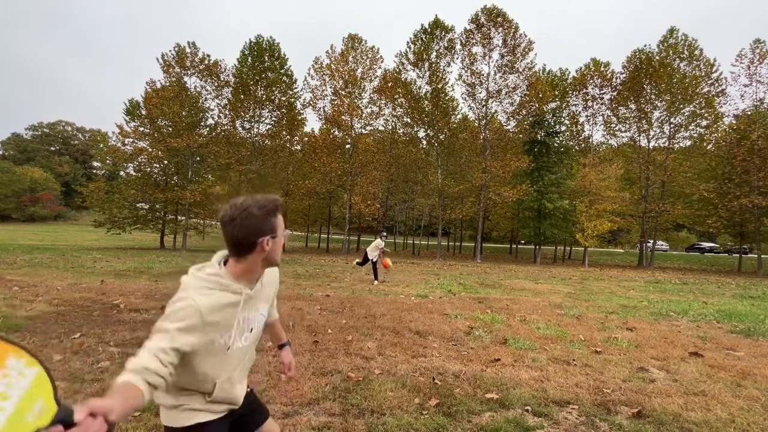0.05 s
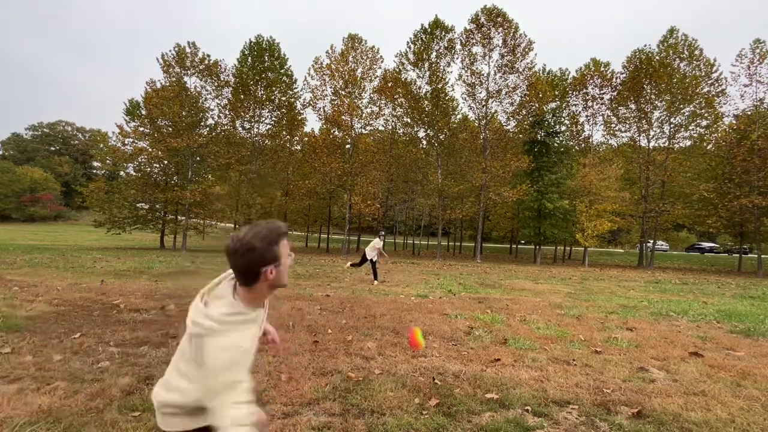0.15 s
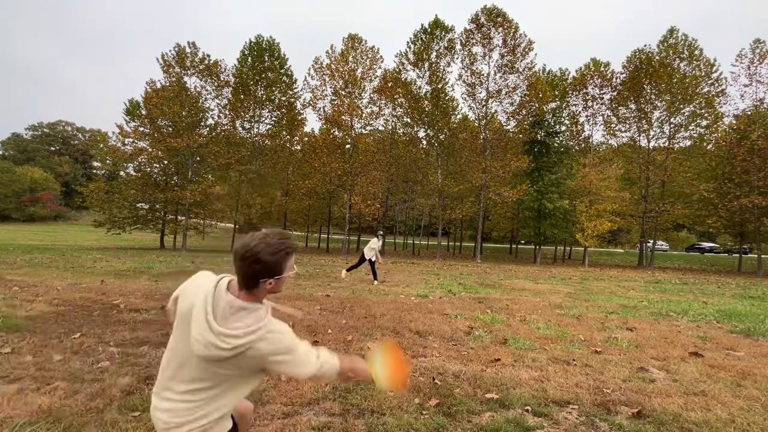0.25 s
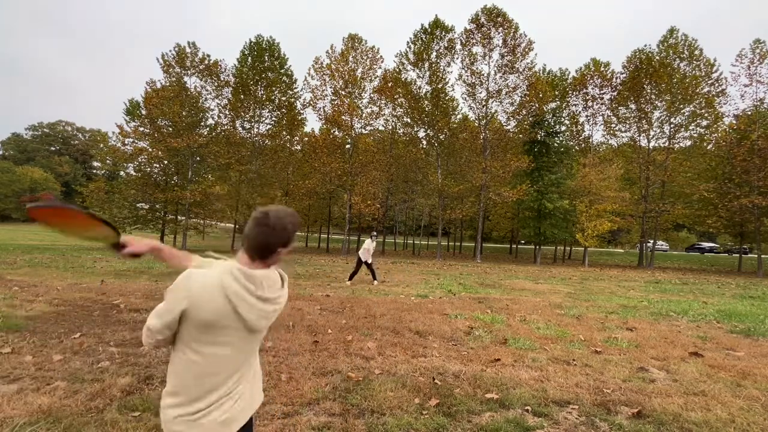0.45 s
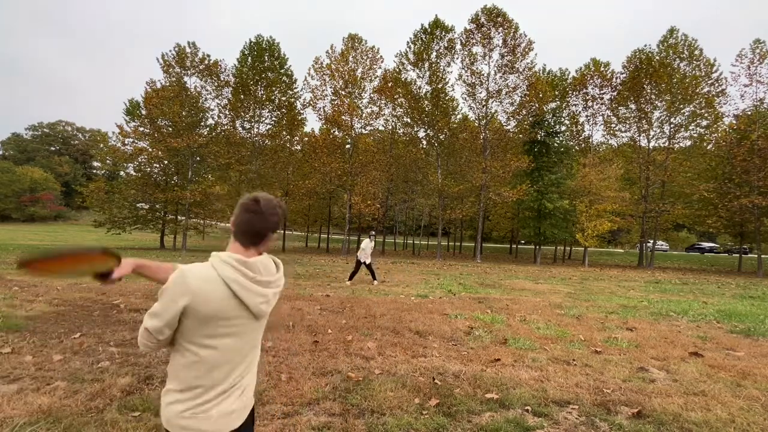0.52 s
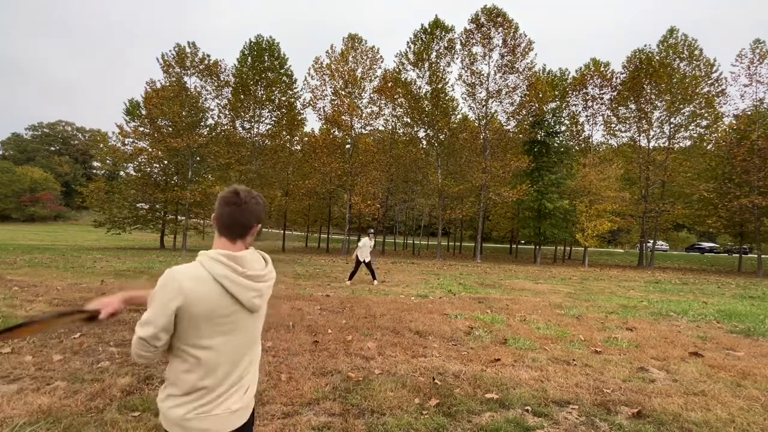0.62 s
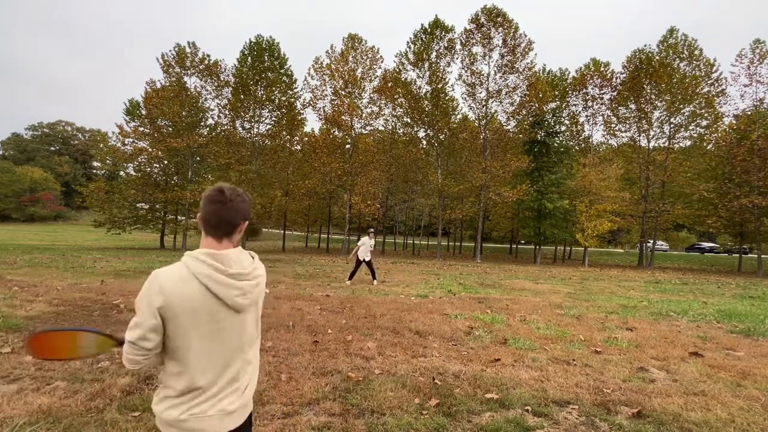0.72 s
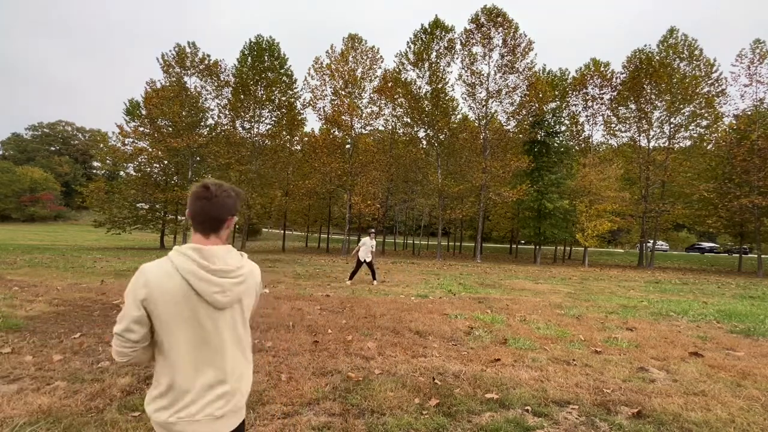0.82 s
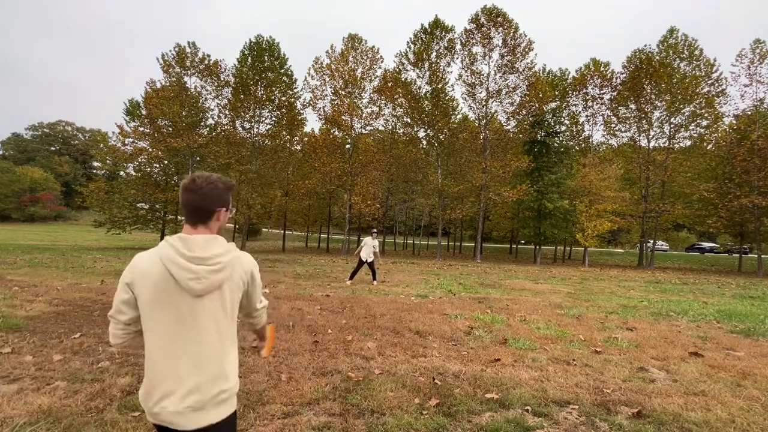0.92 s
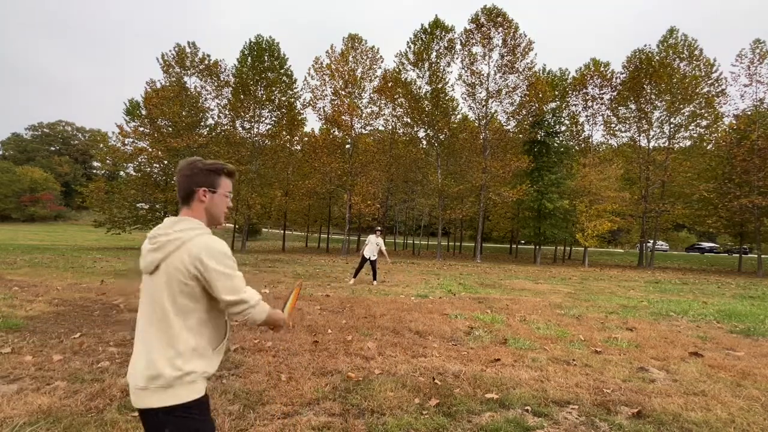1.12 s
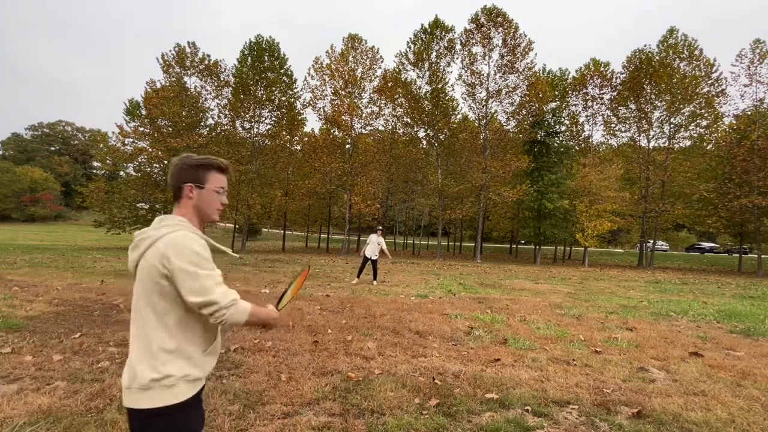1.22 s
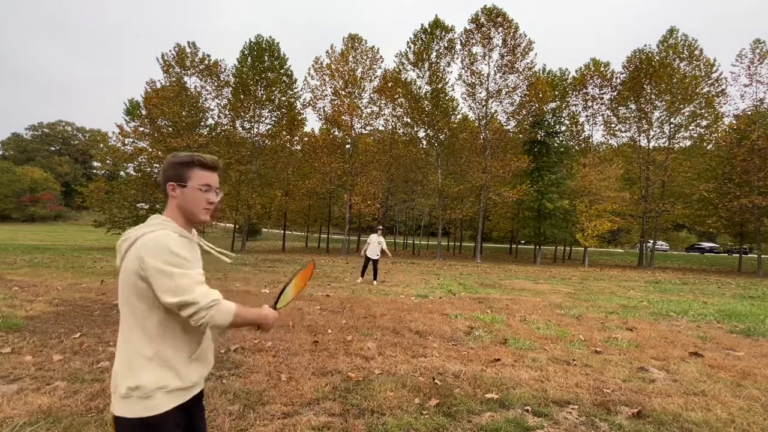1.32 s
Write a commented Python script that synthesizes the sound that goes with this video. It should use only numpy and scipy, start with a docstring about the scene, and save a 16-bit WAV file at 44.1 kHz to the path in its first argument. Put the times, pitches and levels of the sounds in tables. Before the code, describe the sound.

A paddle strikes a plastic ball with one sharp, hollow crack close to the microphone, after a brief swish. The ball whistles faintly away, then clothes rustle and feet scuff softly through dry grass in a quiet open field.

```python
"""A brief rush of air ends in a sharp, hollow crack: a paddle hits a plastic ball in an open field.
The impact excites damped modes of ball and paddle, and the blade bends with a low pock.
Air flowing over the ball's holes whistles as it flies away, and it lands with a faint knock.
The player's clothes rub and feet scuff through dry grass, as friction and impact noise,
over a low outdoor rumble and a thin hiss of insects."""
import sys
import numpy as np
from scipy import signal
from scipy.fft import rfft, irfft
from scipy.io import wavfile
from scipy.ndimage import uniform_filter1d

SR = 44100
rng = np.random.default_rng(int(sys.argv[2]) if len(sys.argv) > 2 else 0)


def waveform_to_disk(signal):
    """Save audio, clipped to [-1, 1], as 16-bit WAV at the path in sys.argv[1]."""
    frames = np.transpose(np.atleast_2d(signal))
    scaled = np.clip(frames, -1, 1) * 32767
    samples = np.round(scaled).astype(np.int16)
    wavfile.write(sys.argv[1], SR, samples)


N = 59535
T = np.arange(N) / SR
HIT_S = .2128


def amp(db):
    """Amplitude ratio of a level in decibels."""
    return 10 ** (np.asarray(db) / 20)


def unit_rms(x):
    """Normalisation to unit mean power."""
    return x / np.sqrt(np.mean(x ** 2) + 1e-20)


def curve_at(points, hz):
    """Interpolation along a logarithmic frequency axis."""
    freq_hz, value = np.transpose(points)
    return np.interp(np.log(hz + 1), np.log(freq_hz + 1), value)


def sides(pan_db):
    """Level-difference panning: two gains, the left pan_db above the right."""
    return amp(np.array([[.5], [-.5]]) * pan_db)


def noise(spectrum, pan, coherence, grain_db=0):
    """Spectrally shaped stereo noise of unit rms; grain, a random gain per sample, makes it crackle."""
    hz = np.fft.rfftfreq(N, 1 / SR)
    white = rng.standard_normal((2, N))
    grain = amp(grain_db * np.minimum(rng.exponential(1, N), 5))
    left, independent = rfft(white * grain)
    shared = np.clip(curve_at(coherence, hz) if np.ndim(coherence) else coherence, -1, 1)
    right = shared * left + np.sqrt(1 - shared ** 2) * independent
    gain = amp(curve_at(spectrum, hz)) * sides(curve_at(pan, hz) if np.ndim(pan) else pan)
    return unit_rms(irfft(np.array([left, right]) * gain, N))


def tick(start_s, spectrum, pan):
    """Minimum-phase impulse: a sharp causal pulse of unit energy with the given spectrum."""
    hz = abs(np.fft.fftfreq(2048, 1 / SR))
    log_gain = np.log(amp(curve_at(spectrum, hz)) * sides(curve_at(pan, hz)))
    pulse = np.fft.ifft(np.exp(np.conj(signal.hilbert(log_gain)))).real
    out = np.zeros((2, N))
    at = int(round(start_s * SR))
    out[:, at:at + pulse.shape[1]] = pulse
    return out / np.sqrt(np.sum(out ** 2) / 2)


def decay(start_s, attack_s, hold_s, t60_s):
    """Damped envelope: a linear rise, a hold, then a fall of 60 dB every t60_s."""
    age = T - start_s
    return np.clip(age / attack_s, 0, 1) * amp(-60 * np.maximum(age - attack_s - hold_s, 0) / t60_s)


def swell(peak_s, rise_s, fall_s):
    """Exponential growth to a peak, then exponential decay."""
    return np.exp(-np.maximum((peak_s - T) / rise_s, (T - peak_s) / fall_s))


def tone(start_s, hz):
    """A sine whose phase is the integral of its frequency from start_s on."""
    return np.sin(2 * np.pi * np.cumsum(hz * (T >= start_s)) / SR)


def wander(samples):
    """Low-pass noise: slow random motion of unit rms."""
    return unit_rms(uniform_filter1d(uniform_filter1d(rng.standard_normal(N), samples), samples))


# First instant of contact, then the rough burst: freq_hz, density_db (relative level per hertz)
SNAP_SPECTRUM = [(300, -22), (900, -7.5), (1500, -10), (2300, -8.5), (3100, 7.5), (3800, 0.5), (4600, 2.5),
                 (5600, -9.5), (6800, -17.5), (8200, -11.5), (9400, -8.5), (12500, -7), (14500, -16),
                 (16000, -36.5)]
CRACK_SPECTRUM = [(300, -11.5), (800, 6), (1100, 3), (1400, 7), (2000, 5.5), (2500, -3.5), (3050, 3.5),
                  (3800, -7), (4700, -6), (6500, -21.5), (9500, -15.5), (12500, -20), (15000, -27),
                  (16500, -35.5)]
# Stereo balance of both: freq_hz, pan_db
CRACK_BALANCE = [(700, -13.5), (1500, 7.5), (3100, 2.5), (4700, 20), (7000, 13), (8200, -6), (9400, -18),
                 (11000, 8), (15000, -6)]
# Modes of the ball and the paddle face: pitch_hz, level_db (relative), t60_s, pan_db
IMPACT_MODES = [(748, -29, 0.08, -7), (1373, -31.5, 0.036, 11), (1434, -29.5, 0.072, -3),
                (1760, -26, 0.058, 3.5), (2006, -26, 0.055, 10.5), (2293, -31, 0.05, -8),
                (2694, -36, .06, 3.5), (2944, -25, 0.052, 8), (3394, -29, 0.044, -3.5),
                (3763, -32.5, .055, -1.5), (4310, -34, .04, 9), (4740, -32, .04, 11.5)]


def crack():
    """Impact excitation: a snap and a noise burst set damped modes ringing; the ground scatters a tail."""
    snap_s, rebound_s, echo_s, right_lag_s = .21305, .0008, .0033, .00006
    snap = -amp(-.5) * tick(snap_s, SNAP_SPECTRUM, CRACK_BALANCE)
    rebound = amp(-3.5) * tick(snap_s + rebound_s, SNAP_SPECTRUM, CRACK_BALANCE)
    body_echo = -amp(-5.5) * tick(snap_s + echo_s, SNAP_SPECTRUM, CRACK_BALANCE)  # off the player
    burst = amp(-20) * noise(CRACK_SPECTRUM, CRACK_BALANCE, .6) * decay(HIT_S, .00032, .0034, .041)
    ring = np.zeros((2, N))
    for hz, db, t60_s, pan_db in IMPACT_MODES:
        mode = np.array([tone(HIT_S, hz), tone(HIT_S + right_lag_s, hz)])
        ring += amp(db) * sides(pan_db) * mode * decay(HIT_S, .0005, 0, t60_s)
    scatter = amp(-38.5) * noise(CRACK_SPECTRUM, CRACK_BALANCE, .34) * decay(HIT_S, .005, .006, .13)
    return snap + rebound + body_echo + burst + ring + scatter


def paddle():
    """Flexural vibration gives a hollow pock and displaced air a low pulse; both settle in pitch."""
    age = np.maximum(T - HIT_S, 0)
    bend_hz = 400.2 + 125 * np.exp(-age / .01)
    push_hz = 78.7 + 182 * np.exp(-age / .012)
    bend = tone(HIT_S + .0005, bend_hz) * decay(HIT_S, .0025, .009, .049)
    push = tone(HIT_S + .0013, push_hz) * decay(HIT_S + .0013, .0081, .0046, .019)
    return amp(-8) * bend + amp(-11.5) * push


# Low thump of the blade's wake, also of weight on the ground: freq_hz, density_db
THUMP_SPECTRUM = [(20, -21.5), (60, 2), (160, -3), (260, -12), (500, -28), (2000, -72.5)]


def swing():
    """Turbulence: air rushes round the accelerating blade, and its wake buffets the microphone."""
    rush_spectrum = [(40, 3.5), (110, -7.5), (250, -2), (450, -5), (1000, -7.5), (2500, -21.5),
                     (9000, -29), (15000, -38)]  # freq_hz, density_db
    rush = amp(-37.5) * noise(rush_spectrum, pan=0, coherence=1.0) * swell(.21, .025, .052)
    wake = amp(-30) * noise(THUMP_SPECTRUM, pan=0, coherence=.9) * swell(.245, .008, .0085)
    return rush + wake


# Tones of the ball's holes: pitch_hz, level_db (relative), pan_db
HOLE_TONES = [(2235, -47, 2), (2420, -43, 3), (3560, -58, 6), (3700, -51, 7), (4930, -58, 12)]
# Their common envelope in flight: time_s, gain_db
WHISTLE_ENVELOPE = [(.213, -14), (.243, 6), (.275, -6), (.305, -5.5), (.322, -25), (.348, -8.5),
                    (.368, -16.5), (.395, -45)]


def whistle():
    """Flow-excited tones: the spinning ball's holes sing, fluttering, sinking and fading as it slows."""
    sag_per_s = .27
    sag = 1 - sag_per_s * np.maximum(T - HIT_S, 0)
    song = np.zeros((2, N))
    for hz, db, pan_db in HOLE_TONES:
        pitch_hz = hz * sag * (1 + .0019 * wander(samples=200))
        flutter = 1 + .35 * wander(samples=300)
        song += amp(db) * sides(pan_db) * tone(HIT_S, pitch_hz) * flutter
    time_s, gain_db = np.transpose(WHISTLE_ENVELOPE)
    return song * amp(np.interp(T, time_s, gain_db)) * (T < time_s[-1])


# Footfalls: peak_s, rise_s, fall_s, thud_db, grass_db, weight_db
FOOTFALLS = [(.424, 0.0043, 0.014, -37, -58, -59), (.448, 0.0084, 0.015, -28.5, -41.5, -39),
             (0.626, 0.047, 0.065, -46.5, -65.5, -50), (0.889, 0.027, 0.036, -47, -53, -72),
             (1.077, 0.007, 0.013, -42.5, -77, -42), (1.275, .015, 0.019, -50, -66, -55.5)]
# Shoes and cloth brushing along: peak_s, rise_s, fall_s, level_db
SHOE_BRUSHES = [(.36, 0.015, 0.036, -60), (.80, 0.16, 0.056, -60), (1.184, 0.048, 0.022, -45)]
# Dry stalks breaking: start_s, energy_db
STALK_SNAPS = [(0.76, -36), (0.8506, -23), (.884, -27), (0.892, -34), (1.18, -32)]
# Struck turf and crushed grass: freq_hz, density_db
TURF_SPECTRUM = [(120, -20.5), (200, -31), (265, -6), (350, -2), (430, 2.5), (520, -6), (610, -6),
                 (850, -14.5), (1300, -19.5), (2000, -23), (3000, -42), (6000, -51)]
GRASS_SPECTRUM = [(500, -9.5), (2000, -1.5), (3100, -21), (4400, 4.5), (6500, 0.5), (9500, 8),
                  (11000, -3.5), (13000, -16), (14300, -13), (15500, -47)]
# Stereo balance of the grass: freq_hz, pan_db
GRASS_BALANCE = [(1000, 5.5), (2400, -5.5), (4400, 2.5), (6500, 25.5), (9000, -3), (14000, 0.5)]


def feet():
    """Impact, friction and brittle fracture: soles thud on turf, brush through grass and snap stalks."""
    crush_lead_s = .0034  # the grass gives way just before the sole meets the ground
    thud, crush, weight = sum(amp(levels_db)[:, None] * swell(peak, rise, fall)
                              for peak, rise, fall, *levels_db in FOOTFALLS)
    crush = np.interp(T + crush_lead_s, T, crush)
    brush = sum(amp(db) * swell(peak, rise, fall) for peak, rise, fall, db in SHOE_BRUSHES)
    snaps = sum(amp(db) * tick(start, GRASS_SPECTRUM, GRASS_BALANCE) for start, db in STALK_SNAPS)
    ground = thud * noise(TURF_SPECTRUM, -1.6, .48) + weight * noise(THUMP_SPECTRUM, 0, .98)
    crunch = crush * noise(GRASS_SPECTRUM, GRASS_BALANCE, .31, grain_db=2.5)
    scuff = brush * noise(GRASS_SPECTRUM, GRASS_BALANCE, .3, grain_db=4.5)
    return ground + snaps + crunch + scuff


# Clothes rubbing as the body turns: peak_s, rise_s, fall_s, level_db
CLOTH_RUBS = [(0.273, .005, 0.0037, -39), (.39, 0.034, 0.076, -50.5), (.517, 0.012, 0.073, -60)]
# Rubbing cloth and the fine hiss of a sleeve: freq_hz, density_db
CLOTH_SPECTRUM = [(100, -13.5), (300, -5.5), (950, 1), (1500, -6), (2800, -13.5), (4800, -9.5),
                  (7000, -28.5), (14000, -36.5)]
SLEEVE_SPECTRUM = [(3000, -22), (8000, -24), (10500, -2), (12500, -2), (14000, -1), (15000, -30)]


def clothes():
    """Sliding friction: cloth zips and rubs in the follow-through; a sleeve hisses as the arm drops."""
    zip_s, zip_hz, rise_hz_per_s = .352, 6800, 18000
    pitch_hz = zip_hz + rise_hz_per_s * np.clip(T - zip_s, -.04, .04)
    zipping = amp(-56.5) * sides(4) * tone(0, pitch_hz) * wander(samples=45) * swell(zip_s, .018, .016)
    rub = sum(amp(db) * swell(peak, rise, fall) for peak, rise, fall, db in CLOTH_RUBS)
    rustle = rub * noise(CLOTH_SPECTRUM, pan=1, coherence=.14, grain_db=1.5)
    sleeve = amp(-65) * decay(.538, .017, .055, .39) * noise(SLEEVE_SPECTRUM, pan=0, coherence=.7)
    return zipping + rustle + sleeve


# The ball's contacts with the ground: start_s, level_db
LANDING_CONTACTS = [(1.0637, -40), (1.066, -51)]
# Their knock: freq_hz, density_db
KNOCK_SPECTRUM = [(200, -4), (800, -12.5), (1250, 3.5), (1700, -0.5), (2300, -13.5), (3000, -35),
                  (4500, -16), (8000, -26), (14000, -46)]


def landing():
    """Damped impact: a faint double knock as the ball meets the ground."""
    envelope = sum(amp(db) * decay(start, .00088, .0011, .032) for start, db in LANDING_CONTACTS)
    return envelope * noise(KNOCK_SPECTRUM, pan=1.7, coherence=.23)


# Open-air background: freq_hz, density_db
FIELD_SPECTRUM = [(20, -34), (40, -15), (62, -0.5), (100, 2), (150, -9.5), (250, -17.5), (500, -10.5),
                  (900, -10), (1500, -18.5), (2800, -32), (4500, -35), (6200, -30.5), (7300, -24),
                  (8500, -36.5), (11000, -36.5), (13500, -41.5), (14400, -45.5), (15200, -66), (17000, -80)]
# Its stereo balance: freq_hz, pan_db
FIELD_BALANCE = [(100, 2), (700, -1), (2400, 2), (4400, 11), (8000, 5), (14000, -2.5)]
# Likeness of its two sides: freq_hz, coherence (-1 to 1)
FIELD_COHERENCE = [(100, 0.95), (290, 0.29), (640, -0.65), (1400, -0.72), (3100, -0.65), (7000, -0.41),
                   (14000, .4)]


def field():
    """Ambient noise: low rumble, soft leaves and far insects merge in one gently wavering spectrum."""
    level_db = -47.5 + .77 * wander(samples=2500)
    return amp(level_db) * noise(FIELD_SPECTRUM, FIELD_BALANCE, FIELD_COHERENCE)


def scene():
    """Superposition: the pressures of all sources add in the open air."""
    hit = amp(5) * (crack() + paddle())
    return hit + swing() + whistle() + feet() + clothes() + landing() + field()


def record(dry):
    """Automatic gain control holds the hit down and recovers; clipping and a low-pass filter follow."""
    threshold_db, recovery_db_per_s, cutoff_hz = -9.5, 33, 16500
    power_db = 10 * np.log10(abs(uniform_filter1d((dry ** 2).mean(0), size=130)) + 1e-12)
    recovery_db = T * recovery_db_per_s
    held_db = np.maximum.accumulate(power_db + recovery_db) - recovery_db  # decaying peak hold
    reduction_db = uniform_filter1d(np.maximum(held_db - threshold_db, 0), size=60)
    ducked = np.clip(dry * amp(-reduction_db), -1, 1)
    lowpass = signal.firwin(255, cutoff_hz, window=("kaiser", 9), fs=SR)
    return signal.oaconvolve(ducked, lowpass[None], "same")


dry = scene()
out = record(dry)
waveform_to_disk(out)
```